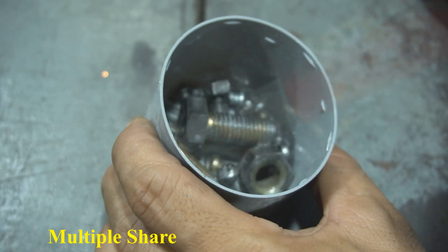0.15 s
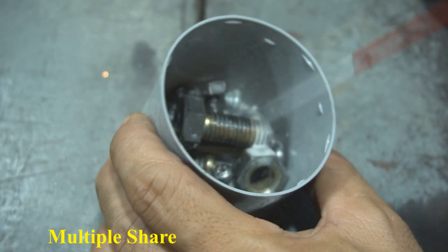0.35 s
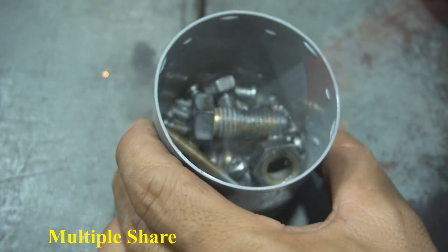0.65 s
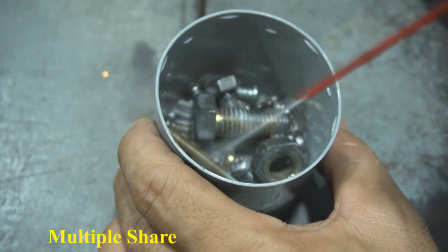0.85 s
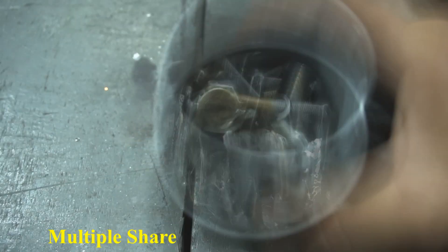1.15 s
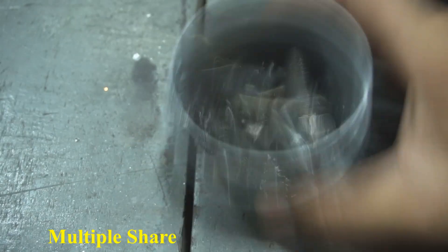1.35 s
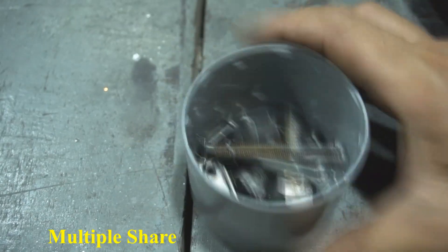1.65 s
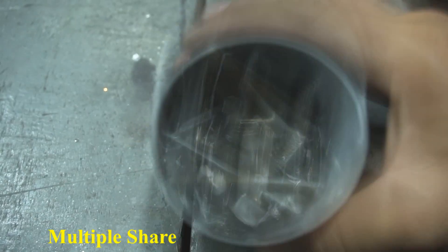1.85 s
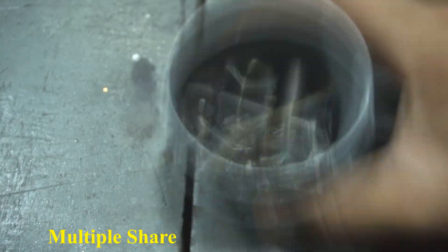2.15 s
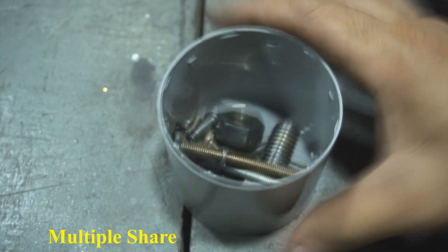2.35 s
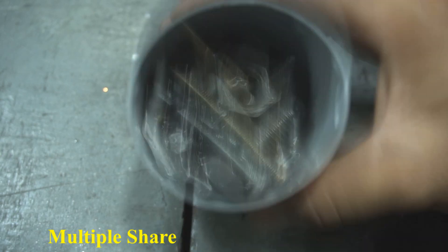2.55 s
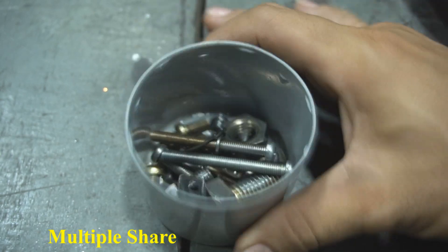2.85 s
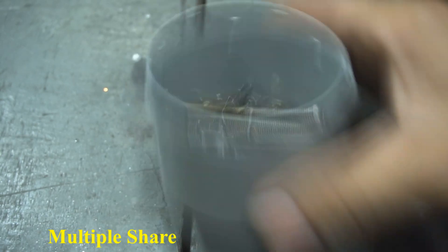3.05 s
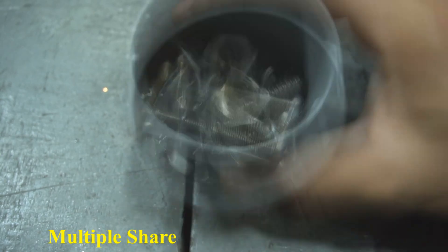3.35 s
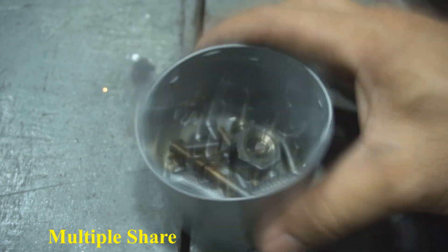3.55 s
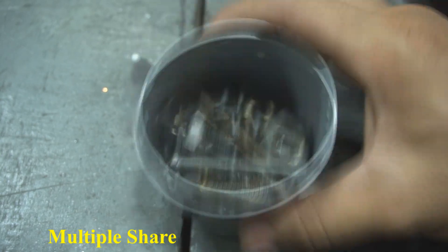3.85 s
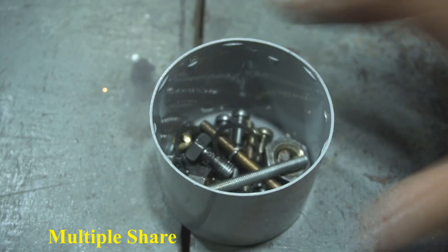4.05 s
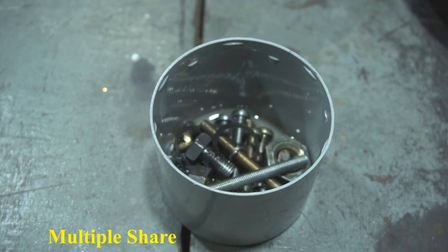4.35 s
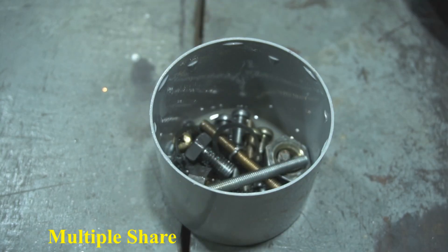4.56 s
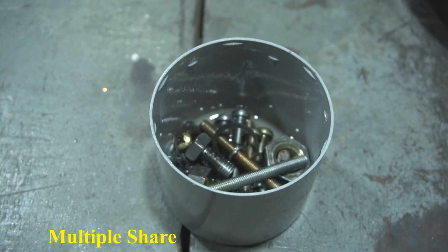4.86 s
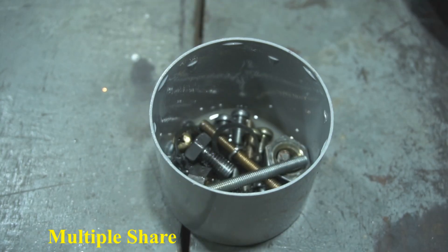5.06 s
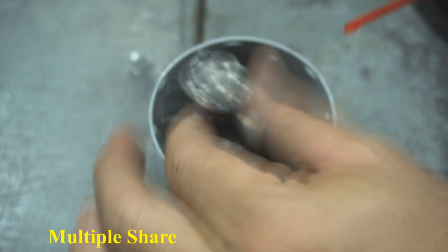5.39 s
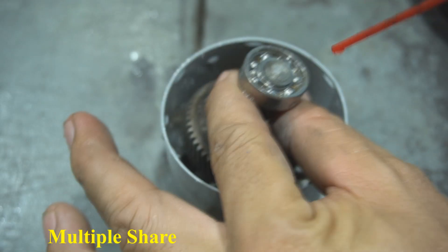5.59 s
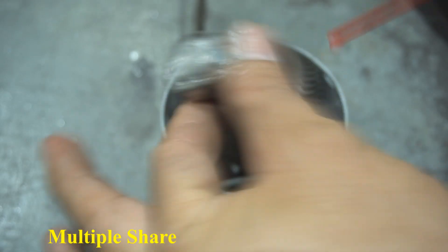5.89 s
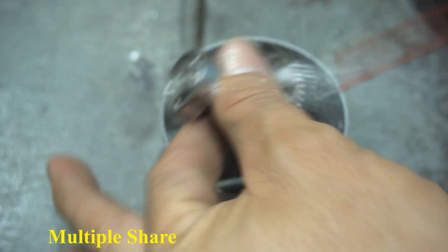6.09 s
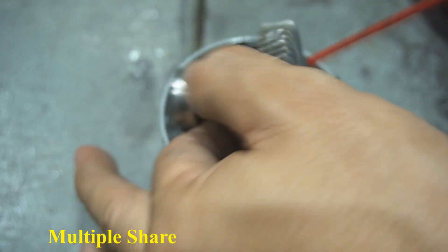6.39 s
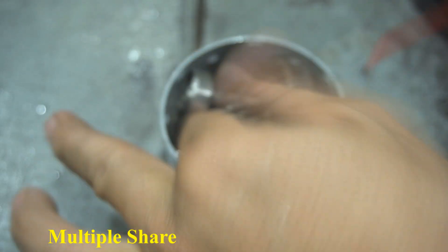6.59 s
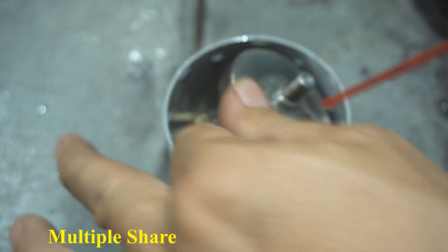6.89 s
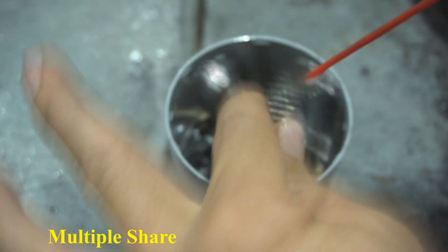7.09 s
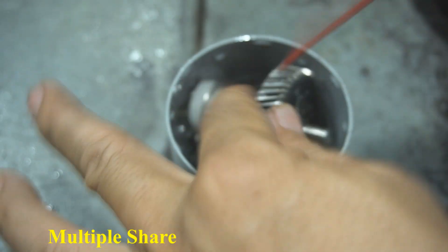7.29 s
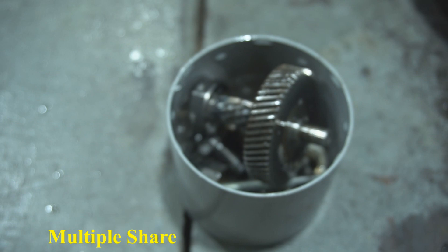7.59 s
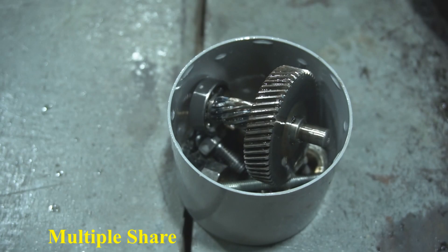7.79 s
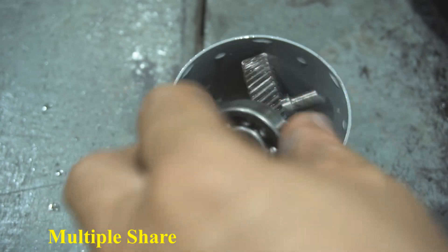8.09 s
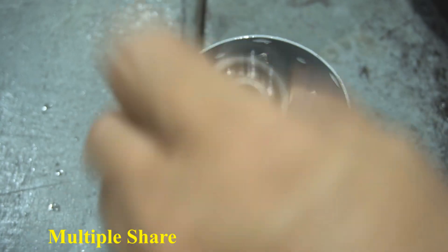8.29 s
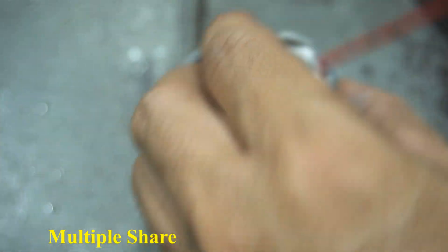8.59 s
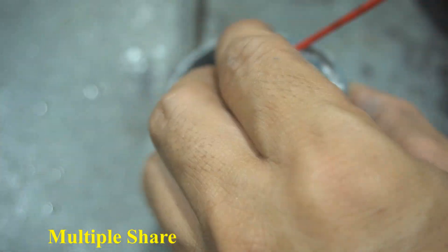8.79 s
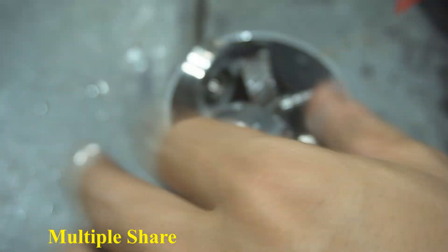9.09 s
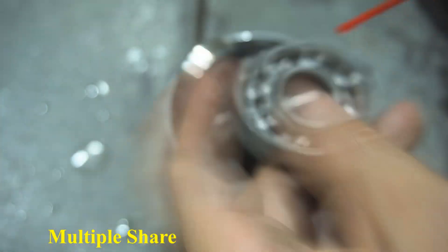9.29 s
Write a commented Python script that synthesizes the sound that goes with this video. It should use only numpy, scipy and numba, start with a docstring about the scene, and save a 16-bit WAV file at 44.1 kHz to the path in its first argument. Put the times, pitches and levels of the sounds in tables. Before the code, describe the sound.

Aerosol spray hisses into a tin cup, cuts off, then bolts rattle in shaken bouts, followed by short spray bursts and metal clinks over faint insects.

```python
"""A tin cup of bolts and nuts on a workshop floor. First an aerosol can sprays into it: filtered droplet grains.
The near sounds stop abruptly, then a hand shakes the cup in quick bouts: bunched impacts ring tin and steel.
A thin high chirp, a filtered noise band, and soft friction grains of brushing fingers follow.
Then parts are lifted, sprayed in short bursts and clink back, as small flurries of contacts on resonances.
Throughout, insects trill outside (throbbing narrow-band grains) over a low town rumble of filtered noise."""
import sys
import numpy as np
from scipy import signal
from scipy.fft import rfft, irfft
from scipy.io import wavfile
from scipy.ndimage import uniform_filter1d
from numba import njit

SR = 44100
rng = np.random.default_rng(int(sys.argv[2]) if len(sys.argv) > 2 else 0)


def materialize(psi):
    """Save the field psi as 16-bit PCM at rate SR to the path in sys.argv[1].

    A 1-D psi becomes a single channel; in a 2-D psi each row is a channel.
    """
    bounded = np.clip(np.atleast_2d(psi).T, -1, 1)
    quanta = np.round(bounded * 32767).astype(np.int16)
    wavfile.write(sys.argv[1], SR, quanta)


N = 416304
T = np.arange(N) / SR

# All dB in the tables are relative; the functions add make-up gains.
# Background levels. Each row: time in seconds, rumble in dB, hiss in dB, insects in dB.
OUTSIDE_LEVELS = [(0, -61.5, -71, -78), (.979, -59.5, -58, -76), (1.0, -69, -70, -78), (2.2, -75, -69, -87),
                  (3.0, -71.5, -71, -80.5), (4.101, -68, -67, -77.5), (4.6, -64, -66, -74.5),
                  (5.1, -61, -61, -72.5), (6.3, -63, -64.5, -74.5), (6.9, -59, -60, -73.5),
                  (7.5, -63, -62.5, -73.5), (9.44, -59, -64, -73.5)]
# Spectrum of town rumble and hiss. Each row: frequency in Hz, density in dB per Hz.
TOWN_SPECTRUM = [(15, -24), (25, -17.5), (45, -2), (100, -1), (210, -4), (350, -11), (450, -21),
                 (800, -22.5), (1300, -30), (3000, -28), (6400, -32.5), (9000, -35), (16000, -38.5)]
# Narrow bands of a distant machine. Each row: frequency in Hz, width in Hz, level in dB.
DRONE_BANDS = [(140, 24, -4), (830, 30, -16), (1170, 30, -21)]
# Swell of the thin chirp. Each row: time in seconds, level in dB.
CHIRP_LEVELS = [(4.38, -100), (4.44, -92), (4.6, -83), (4.64, -100)]
# Depth of the insects' regular throb over time. Each row: time in seconds, depth in dB either way.
THROB_DEPTHS = [(3.6, 0), (4.1, 2), (5.2, 4), (5.7, 0.5)]
# Fingers brushing floor and can. Each row: full level from and until in seconds, level in dB,
# rise in dB per second, treble in dB.
BRUSHES = [(4.87, 4.93, -70, 150, 9), (4.966, 4.967, -55, 800, 3), (5.04, 5.13, -69.5, 150, 7),
           (5.17, 5.31, -74, 150, 4), (7.68, 7.7, -72, 170, 4), (7.766, 7.77, -37.5, 1100, -2.5),
           (7.78, 7.82, -45, 1000, -23)]
# Single clinks. Each row: start in seconds, level in dB, cup pitch in Hz, 60 dB decay in seconds, kind.
CLINK_EVENTS = [(2.4357, -29, 1520, 0.12, "tick"), (2.44, -50.5, 1530, 0.17, "thud"),
                (3.525, -43, 1530, 0.18, "thud"), (4.033, -40, 1220, 0.23, "nut"),
                (4.0735, -44, 1520, .05, "tick"), (4.123, -50, 1520, 0.064, "screw"),
                (4.1594, -56, 1440, .07, "nut"), (4.9646, -39.5, 1150, 0.033, "tick"),
                (5.442, -48.5, 1280, 0.041, "cup"), (5.498, -45, 1250, 0.069, "cup"),
                (5.5057, -39, 1260, .05, "bolt"), (5.5644, -46, 1190, .038, "bright"),
                (5.6, -38.5, 1230, 0.052, "nut"), (5.617, -52, 1330, 0.063, "cup"),
                (5.63, -39, 1250, 0.032, "cup"), (5.955, -43, 1274, 0.068, "cup"),
                (6.664, -38, 1330, 0.075, "cup"), (6.67, -29, 1370, .073, "screw"),
                (6.7751, -29.5, 1330, 0.12, "cup"), (6.792, -27, 1270, 0.04, "bolt"),
                (6.8094, -27, 1270, 0.069, "screw"), (6.849, -40.5, 1280, 0.12, "cup"),
                (6.912, -26, 1270, 0.044, "nut"), (6.9247, -34.5, 1240, 0.044, "nut"),
                (7.195, -45, 1300, 0.085, "cup"), (7.216, -36, 1430, .05, "screw"),
                (7.385, -38, 1350, 0.088, "cup"), (7.4844, -50, 1180, 0.05, "bright"),
                (7.685, -58, 1280, .05, "base"), (7.748, -39.5, 1280, .065, "tick"),
                (7.7613, -45, 1270, 0.097, "base"), (8.0618, -32.5, 1490, 0.029, "tick"),
                (8.0784, -49, 1310, .05, "tick"), (8.165, -33, 1330, 0.15, "bright"),
                (8.19, -39.5, 1334, 0.13, "thud"), (8.1998, -25.5, 1350, 0.044, "screw"),
                (8.2846, -52, 1490, 0.049, "nut"), (8.456, -53, 1150, .04, "tick"),
                (9.0518, -52.5, 1370, .053, "bright"), (9.0668, -35.5, 1340, 0.036, "bright"),
                (9.079, -36, 1390, 0.025, "bright"), (9.1228, -51, 1510, 0.037, "screw"),
                (9.1404, -26, 1540, 0.084, "tick"), (9.1614, -43, 1430, .033, "tick"),
                (9.2449, -42, 1420, .063, "tick"), (9.262, -40.5, 1360, 0.18, "tick"),
                (9.2954, -41, 1290, 0.033, "nut")]
# What each kind of clink sets going. Each entry: cup, nut, screw, bolt, treble, thud and base drive,
# in dB against the clink's level.
CLINK_KINDS = {"cup": (-3, -4, -18, -25, -15, -14, -12), "tick": (-15, -37, -17, -24, -15, -23.5, -26),
               "nut": (-14, -4, -22, -22, -45, -21, -20), "screw": (-15.5, -23, 1, -23, -1, -19.5, -19),
               "bolt": (-8.5, -23, -4, 4, 0, -16.5, -15), "bright": (-18, -29, -8, -18, 5, -19, -21),
               "thud": (-13, -15, -26, -22, -14, -0.5, -7), "base": (-10, -13, -20, -15, -10, -18, 3.5)}
# Bouts of parts sliding in the cup. Each row: full level from and until in seconds, level in dB,
# rise in dB per second, cup ring and bolt ring in dB against that level.
SLIDES = [(1.195, 1.715, -33.5, 870, -2, -8), (1.79, 1.82, -62, 500, 7, -15),
          (1.865, 1.93, -60, 400, 11.5, -12), (1.96, 2.405, -34, 515, 1, -7.5),
          (2.44, 2.57, -58.5, 500, -1, -19), (2.67, 2.91, -32.5, 606, 1, -6),
          (3.172, 3.175, -36.5, 1200, 1, -7), (3.31, 3.525, -31.5, 790, -3, -9),
          (3.62, 3.71, -64, 500, 4, -20), (3.73, 3.975, -36, 910, -0.5, -8), (4.06, 4.15, -66, 500, 7, -22),
          (4.17, 4.24, -71, 500, -1, -25), (5.45, 5.46, -66.5, 500, 7, -22),
          (5.512, 5.515, -48, 650, -1.5, -6), (5.612, 5.625, -55, 250, 4.5, -6),
          (6.674, 6.676, -42.5, 700, -4, -15), (6.79, 6.8, -37.5, 475, -6, -5),
          (6.912, 6.915, -49, 2500, -4, -20), (8.062, 8.1, -62.5, 1500, -1, -22),
          (8.204, 8.205, -45.5, 393, -1.5, -13), (8.24, 8.3, -71, 500, 0, -20),
          (9.08, 9.081, -55.5, 550, -12, -13), (9.146, 9.148, -39.5, 910, -5, -19),
          (9.275, 9.28, -52.5, 190, -2.5, -23)]
# The load thrown against the cup wall. Each row: time in seconds, level in dB.
THROWS = [(1.2552, -24.5), (1.316, -20), (1.369, -17), (1.422, -16.5), (1.467, -16.5), (1.4946, -27),
          (1.5235, -19), (1.575, -22), (1.6019, -29), (1.6293, -22.5), (1.6854, -25), (1.7265, -22.5),
          (1.761, -28), (1.8064, -49), (1.9446, -23), (1.9775, -25.5), (2.034, -21), (2.064, -22),
          (2.113, -26), (2.142, -19), (2.194, -18), (2.2476, -20), (2.2968, -23), (2.3275, -21.5),
          (2.379, -19.5), (2.432, -23), (2.5268, -51), (2.5472, -47), (2.649, -23), (2.667, -44),
          (2.7048, -23.5), (2.758, -21.5), (2.8133, -21), (2.8435, -18), (3.156, -26), (3.2117, -48),
          (3.289, -29.5), (3.3065, -24), (3.373, -19.5), (3.487, -21), (3.7235, -26.5), (3.7412, -27),
          (3.7805, -15), (3.838, -16.5), (3.89, -21), (3.916, -19.5), (3.9466, -17.5), (3.995, -23)]
# Spectrum of steel cracking on tin. Each row: frequency in Hz, density in dB per Hz.
CRACK_SPECTRUM = [(120, -45), (260, -19), (430, -24), (600, -10), (900, -11.5), (1400, 2), (2000, -6.5),
                  (2700, -6), (4000, -5), (6500, -7.5), (11500, -13), (15500, -14)]
# Resonances of the cup. Each row: frequency in Hz before loading, width in Hz, level in dB.
CUP_MODES = [(598, 60, -18), (1170, 70, -10), (1300, 50, -6), (1435, 45, 0), (1530, 55, -2),
             (1890, 100, -13)]
# Resonances of the short bolts and nuts. Each row: frequency in Hz, width in Hz, level in dB.
NUT_MODES = [(3330, 160, -4), (5280, 90, 0), (7940, 80, -11), (8960, 110, -4), (12650, 70, -10)]
# Resonances of the long bolt. Each row: frequency in Hz, width in Hz, level in dB.
BOLT_MODES = [(14545, 45, 0), (14640, 60, -3)]
# Presses of the can. Each row: full flow from and until in seconds, level in dB, rise in dB per second
# before the valve bend, treble in dB, splash in dB, hollow the jet blows across in Hz,
# fall in dB per second before the bend.
PRESSES = [(0, 1.0, -34.5, 500, -4, -32, 7600, 600), (5.862, 5.91, -35, 479, -5, -9, 5630, 598),
           (6.166, 6.213, -33, 482, -10.5, -14, 6430, 554),
           (6.604, 6.613, -36, 600.5, -9.5, -13.5, 6400, 697),
           (7.101, 7.125, -35.5, 399, -4.5, -10, 8160, 800), (7.287, 7.369, -33, 650, -6, -15, 7500, 603),
           (8.655, 8.787, -36, 701, 1, -12.5, 8300, 601), (8.8, 8.923, -41, 296, -14, 4.5, 2400, 801)]
# Spectrum of the open jet. Each row: frequency in Hz, density in dB per Hz.
OPEN_JET_SPECTRUM = [(180, -33), (300, -29), (634, -4), (946, -16), (1280, -16), (3030, -6.5), (3460, -4.5),
                     (5080, -0.5), (6000, -2.5), (14200, 4.5), (16000, 6)]
# Spectrum while the nozzle points into the cup. Each row: frequency in Hz, density in dB per Hz.
CUP_JET_SPECTRUM = [(150, -52), (250, -28), (386, -16.5), (538, -21.5), (618, -9), (955, -17.5),
                    (1240, -7.5), (1760, -14), (1980, -6.5), (3980, -7.5), (4650, -5), (5930, -7),
                    (8400, -4.5), (14200, 0), (16000, -1)]
# Whistling eddies among the parts. Each row: frequency in Hz, width in Hz, level in dB.
EDDY_MODES = [(2400, 400, -6), (3600, 500, -3), (4700, 500, 0), (6200, 700, -2), (8200, 700, 0),
              (10200, 900, 0), (12500, 1000, 0), (14600, 1000, 0)]
# Ring of the cup wall under the jet. Each row: frequency in Hz, width in Hz, level in dB.
SPLAT_MODES = [(1650, 230, 19), (2140, 224, 0), (3330, 1100, -6)]
# The jet strikes the cup wall. Each row: time in seconds, level in dB.
WALL_STRIKES = [(0.02, -10), (0.184, -18), (0.214, -8), (0.641, -6.5)]

TRILL_HZ = 15.42  # rate of the insects' throb
INSECT_HZ, INSECT_WIDTH_HZ = 7554, 470  # centre and first filter's width
BRUSH_FALL_DB_S, SLIDE_FALL_DB_S = 350, 429
SOFT_CUP, SOFT_BOLT = 0.23, -0.43  # dB of ring gained per dB that the sliding is under full
LOADED_S, LOADED_PITCH = 5.3, .93  # loaded with a heavy gear, the cup rings lower in the rattle
INTO_CUP_S = 1.3  # the nozzle points into the cup until here
SPRAY_BEND = 2.1  # the valve opens and shuts quickly at low flow, gently near full flow
WEAK_SPLASH = 0.58  # dB of splash gained per dB that the flow is under full
SPRAY_PAN_DB = -2.3  # left minus right, about which the spray wanders
ROOM_T60_S, EARLY_T60_S, ROOM_DB = 0.2, 0.041, -8
STOP_S, STOP_TAIL_DB, STOP_FADE_S = .982, -19, 0.036  # the near sounds break off here
TOP_HZ = 15750


def undb(db):
    """Turn dB into an amplitude factor."""
    return 10 ** (np.asarray(db) / 20)


def unit(x):
    """Scale to rms 1."""
    return x / np.sqrt(np.mean(x ** 2))


def colour(x, table, size=2048):
    """Causal minimum-phase filter that follows (Hz, dB) points, built by folding the cepstrum."""
    hz, db = np.transpose(table)
    bins_hz = np.arange(size // 2 + 1) * SR / size
    curve_db = np.interp(np.log(bins_hz + 1), np.log(hz), db)
    cepstrum = irfft(np.log(undb(curve_db)))
    cepstrum[1:size // 2] *= 2
    cepstrum[size // 2 + 1:] = 0
    impulse = irfft(np.exp(rfft(cepstrum)))
    return signal.fftconvolve(x, impulse)[:N]


@njit
def svf(x, hz, width):
    """State-variable band-pass whose centre may move, gain 1 at the centre."""
    y, band_state, low_state = np.empty(len(x)), 0., 0.
    for i in range(len(x)):
        g, k = np.tan(np.pi * hz[i] / SR), width / hz[i]
        v = (band_state + g * (x[i] - low_state)) / (1 + g * (g + k))
        band_state = 2 * v - band_state
        low_state += 2 * g * v
        y[i] = k * v
    return y


def band(x, hz, width_hz):
    """Band-pass at a fixed centre."""
    return svf(x, hz + 0 * T, 1. * width_hz)


def lows(x, hz, order):
    """Keep what lies below a corner."""
    return signal.sosfilt(signal.butter(order, hz, fs=SR, output="sos"), x)


def highs(x, hz, order=4):
    """Keep what lies above a corner."""
    return signal.sosfilt(signal.butter(order, hz, "high", fs=SR, output="sos"), x)


def walk(rate):
    """Random levels held 1 / rate s and slewed; rms 1."""
    k = int(SR / rate)
    steps = np.repeat(rng.standard_normal(N // k + 1), k)
    return unit(uniform_filter1d(steps, k)[:N])


def grains(share, spread_db):
    """One-sample impacts of uneven size on a share of the samples, rms 1."""
    hit = rng.random(N) < share
    size_db = spread_db * np.minimum(rng.exponential(1, N), 3)
    return unit(hit * rng.standard_normal(N) * undb(size_db))


def bursts(times, gains, rise_s, decay_s):
    """Envelope of short flurries: quick rise, exponential fall by 60 dB per decay time."""
    out = np.zeros(N)
    for s, g, d in zip(times, gains, decay_s + 0 * gains):
        i = int(s * SR)
        t = T[:min(SR // 4, N - i)]
        out[i:i + len(t)] += g * (1 - np.exp(-t / rise_s)) * undb(-60 * t / max(d, .005))
    return out


def holds(table, fall_db_s, bend=1):
    """Rise, hold and fall of each row, the loudest one heard: gain, dB under full, that row's other columns."""
    rows = np.array(table, float)
    level_db, row = np.full(N, -160.), np.zeros(N, int)
    shapes = np.c_[rows[:, :4], fall_db_s + 0 * rows[:, 0]]
    for k, (start, stop, db, rise, fall) in enumerate(shapes):
        i = slice(max(int(start * SR) - SR // 4, 0), int(stop * SR) + SR // 4)
        under = rise * np.maximum(start - T[i], 0) + fall * np.maximum(T[i] - stop, 0)
        here = db - 30 * (under / 30) ** bend
        row[i] = np.where(here > level_db[i], k, row[i])
        level_db[i] = np.maximum(here, level_db[i])
    under_db = np.clip(rows[row, 2] - level_db, 0, 30)
    return undb(level_db), under_db, *rows[row, 4:].T


def ring(x, modes, wander, patchy_db, rate=30, pitch=1.):
    """Resonances that drift and come and go as contacts shift from part to part."""
    out = np.zeros(N)
    for hz, width, db in modes:
        gain = undb(db + patchy_db * walk(rate))
        centre_hz = hz * pitch * (1 + wander * walk(rate))
        out += gain * svf(x, centre_hz, 1. * width) / np.sqrt(width)
    return highs(out, 450, order=2)


def pan(x, db, scatter):
    """Place a near sound (dB left minus right); each instant comes from a slightly different spot."""
    sides = undb(np.outer([.5, -.5], db))
    return x * (sides + np.outer([1, -1], scatter * walk(150)))


def outside():
    """Rumble alike on both sides, hiss and a throbbing insect trill unlike; one thin high chirp."""
    s, *rows = np.transpose(OUTSIDE_LEVELS)
    rumble_db, hiss_db, insect_db = (np.interp(T, s, r) for r in rows)
    low, mid, side = (colour(rng.standard_normal(N), TOWN_SPECTRUM) for _ in range(3))
    drone = np.zeros(N)
    for hz, width, db in DRONE_BANDS:
        hum = band(rng.standard_normal(N), hz, width) / np.sqrt(width)
        drone += 12.5 * undb(db + 1.2 * walk(12)) * hum
    rumble = lows(low + drone + 0.11 * np.outer([1, -1], side), 220, order=2)
    hiss = highs(mid + drone, 220, order=2) + np.outer([1, -1], highs(side, 450))

    throb_db = np.interp(T, *np.transpose(THROB_DEPTHS))
    beat = np.cos(2 * np.pi * TRILL_HZ * (T - 4.507))
    throb = undb(throb_db * beat + 0.43 * walk(25))
    trill = []
    for _ in range(2):
        chirring = band(grains(0.04, 1.5), INSECT_HZ, INSECT_WIDTH_HZ)
        trill.append(unit(band(chirring, INSECT_HZ, 1.9 * INSECT_WIDTH_HZ)))
    insects = 3.26 * throb * np.array(trill) * undb(insect_db)

    chirp_db = np.interp(T, *np.transpose(CHIRP_LEVELS), left=-150, right=-150)
    chirp = undb(chirp_db) * unit(band(rng.standard_normal(N), 10900, 120))
    high = hiss * undb(21 + hiss_db) + insects + chirp
    return rumble * undb(21.5 + rumble_db) + high * undb([[-.6], [.6]])


def room(dry):
    """Early scatter off floor and hands, then a short tail; different on each side, none in the bass."""
    t = T[:SR // 3]
    decay = undb(-60 * t / ROOM_T60_S) + 2.4 * undb(-60 * t / EARLY_T60_S)
    tails = rng.standard_normal((2, len(t))) * decay * (t > .0005)
    tails = tails / np.sqrt(np.sum(tails ** 2, axis=1, keepdims=True))
    send = highs(dry.mean(axis=0), 430)
    return undb(ROOM_DB) * signal.fftconvolve(send[None], tails, axes=1)[:, :N]


def rustle():
    """Soft friction: fine uneven grains of skin, with a mid band and a varying treble."""
    gain, _, treble_db = holds(BRUSHES, BRUSH_FALL_DB_S)
    skin = gain * grains(0.35, 5.4)
    body = 0.68 * band(skin, 2000, 2200)
    treble = 0.55 * undb(treble_db) * highs(skin, 7300)
    return pan(body + treble, -2.6, scatter=0.64)


def clinks():
    """Each clink is a short flurry of contacts; its rings, treble and knock differ with what is struck."""
    s, db, cup_hz, decay_s = np.transpose([row[:4] for row in CLINK_EVENTS])
    parts_db = np.transpose([CLINK_KINDS[row[4]] for row in CLINK_EVENTS])
    touch = grains(.25, 1.7)
    mid, cup, nut, screw, bolt, top, thud, base = (
        touch * bursts(s, undb(db + drive_db), 0.00061, decay_s) for drive_db in (0, *parts_db))
    # the cup keeps one clink's pitch until the next
    held_hz = cup_hz[np.maximum(np.searchsorted(s, T) - 1, 0)]
    rings = undb(18.5) * svf(cup, held_hz, 88.0)
    rings += undb(31.5) * ring(nut, NUT_MODES[:1], 0.0056, 1.0)
    rings += undb(26.5) * ring(screw, NUT_MODES[1:2], 0.0031, 1.6)
    rings += undb(36.0) * ring(bolt, BOLT_MODES, 0.0067, 1.5)
    floor_thud = 15.0 * band(band(thud, 276, 64), 114, 165)
    base_knock = 6.2 * band(band(base, 780, 272), 560, 920)
    contact = .5 * band(mid, 3760, 3600) + 0.41 * highs(top, 10000)
    return pan(contact + rings + floor_thud + base_knock, -0.68, scatter=0.27)


def spray():
    """Turbulent jet with droplet fizz; the hollow it crosses colours it, a near surface adds a duller splash."""
    flow, under_db, treble_db, splash_db, hollow_hz, fall_db_s = holds(
        PRESSES, np.array(PRESSES)[:, -1], SPRAY_BEND)
    fizz = grains(.5, 1.7)
    in_cup = unit(colour(fizz, CUP_JET_SPECTRUM))
    in_open = unit(colour(fizz, OPEN_JET_SPECTRUM))
    jet = np.where(T < INTO_CUP_S, in_cup, in_open)
    splash = unit(band(band(jet, 1850, 1900), 1850, 1900))
    hollow = svf(rng.standard_normal(N), hollow_hz * (1 + .08 * walk(18)), 1400.)

    # eddies among the parts whistle briefly at wandering pitches; the top ones follow the treble
    gusts = grains(.5, 1.3)
    eddies = ring(gusts, EDDY_MODES[:5], wander=0.043, patchy_db=5.0, rate=14)
    bright_gusts = gusts * undb(treble_db + 6)
    eddies += ring(bright_gusts, EDDY_MODES[5:], wander=0.043, patchy_db=4.5, rate=14)

    body = lows(jet, 9000, order=4)
    body += 0.97 * undb(treble_db + 1.4 * walk(17)) * unit(highs(jet, 7700))
    body += 0.62 * undb(splash_db + WEAK_SPLASH * under_db) * splash
    body += 0.61 * hollow + 0.4 * unit(eddies)

    s, db = np.transpose(WALL_STRIKES)
    strike = bursts(s - .008, undb(db), 0.011, 0.056)  # the rise starts just ahead
    wall = unit(ring(rng.standard_normal(N), SPLAT_MODES, .01, 1.5))
    splat = strike * 0.11 * (wall + splash)
    unsteady = undb(1.17 * walk(40))
    return pan(flow * unsteady * body + splat, SPRAY_PAN_DB + 2.6 * walk(52), scatter=0.34)


def rattle():
    """Many small collisions, bunched at each stroke, crack; the fewer square blows ring cup, nuts and bolt."""
    slide, under_db, cup_db, bolt_db = holds(SLIDES, SLIDE_FALL_DB_S)
    cup_db = cup_db + SOFT_CUP * under_db
    bolt_db = bolt_db + SOFT_BOLT * under_db
    s, db = np.transpose(THROWS)
    throws = bursts(s - .003, undb(db), .007, .075)  # the rise starts just ahead
    jostle = undb(1.2 * walk(70))
    push = .5 * slide * jostle + 0.26 * throws

    # the hardest contacts of a throw are the brightest
    snap = 0.23 * highs(throws * grains(0.23, 2.5), 6500)
    blows = push * grains(.04, 2.9)
    pitch = np.where(T < LOADED_S, 1, LOADED_PITCH)
    rings = undb(33.5) * ring(blows * undb(cup_db), CUP_MODES, 0.003, 2.1, pitch=pitch)
    rings += undb(29.0) * ring(blows, NUT_MODES, 0.012, 4.7)
    rings += undb(42.5) * ring(blows * undb(bolt_db), BOLT_MODES, 0.0016, 1.6)
    crack = undb(10) * colour(push * grains(.3, 1.0), CRACK_SPECTRUM)
    return pan(crack + snap + rings, -0.91, scatter=0.25)


def scene():
    """Near sounds and their room, broken off once and silent for a moment, over the outside, which drops and swells."""
    near = spray() + rattle() + clinks() + rustle()
    # a sudden drop, a short faint tail, silence, then the near sounds return
    gate_s = STOP_S + np.array([-.002, .002, STOP_FADE_S, .21, .24])
    gate = np.interp(T, gate_s, [1, undb(STOP_TAIL_DB), 0, 0, 1])
    return gate * (near + room(near)) + outside()


def record(dry):
    """Saturation rounds the sharpest peaks and a steep low-pass cuts the top."""
    soft = .16 * np.tanh(dry / .16)
    return signal.sosfilt(signal.ellip(10, .2, 70, TOP_HZ, fs=SR, output="sos"), soft)


dry = scene()
out = record(dry)
materialize(out)
```